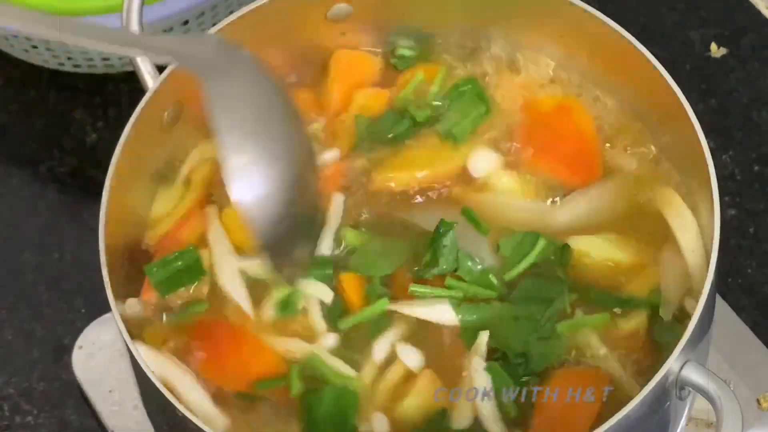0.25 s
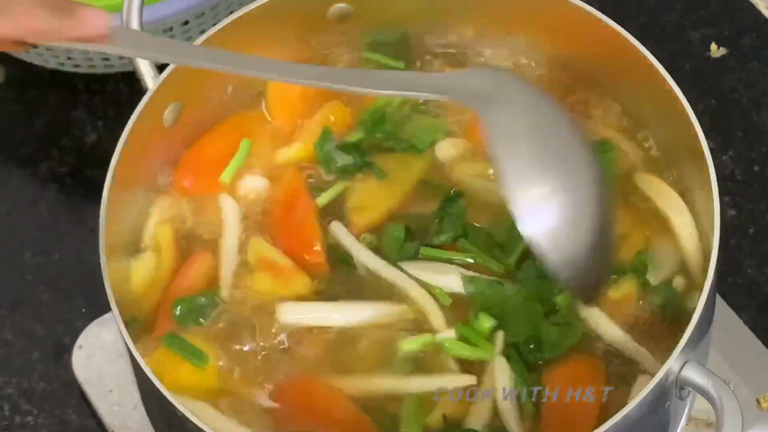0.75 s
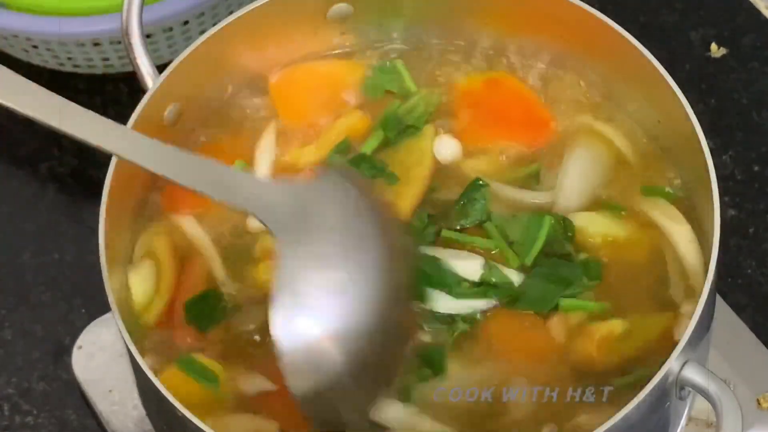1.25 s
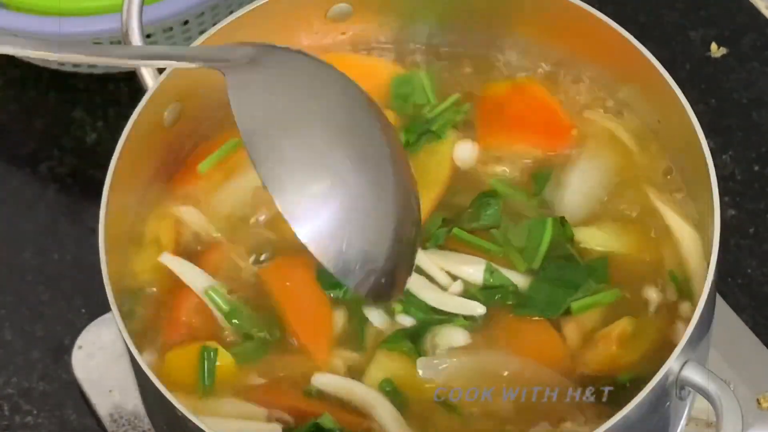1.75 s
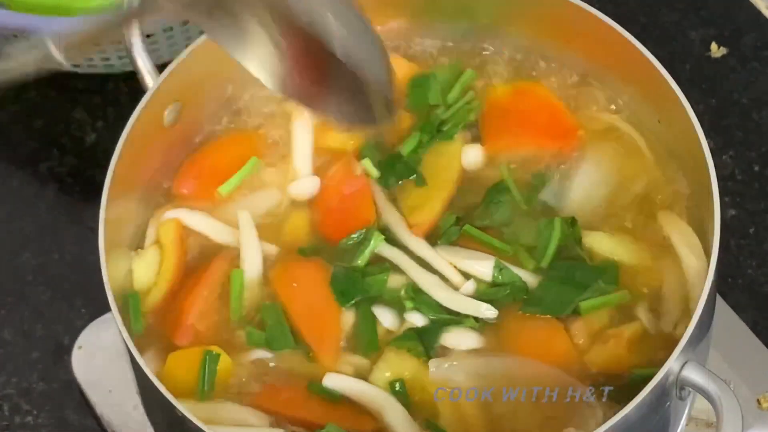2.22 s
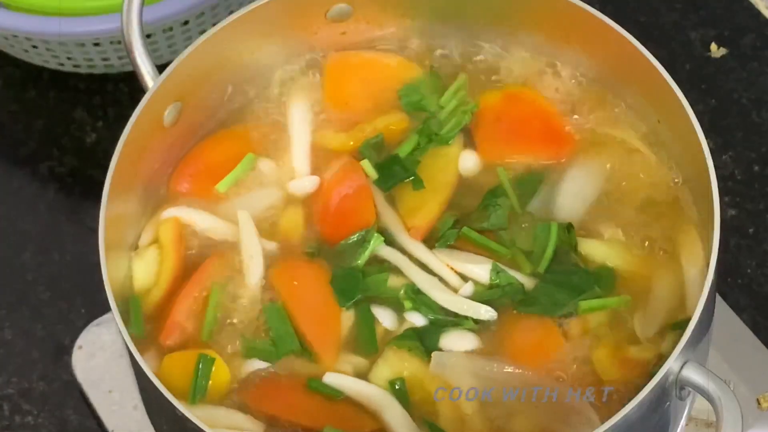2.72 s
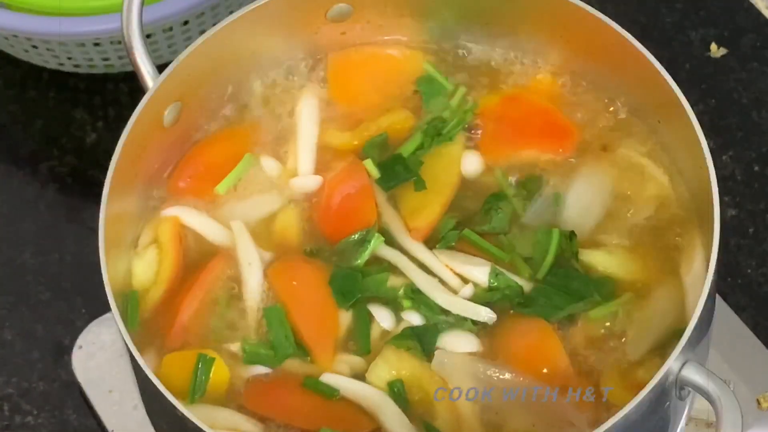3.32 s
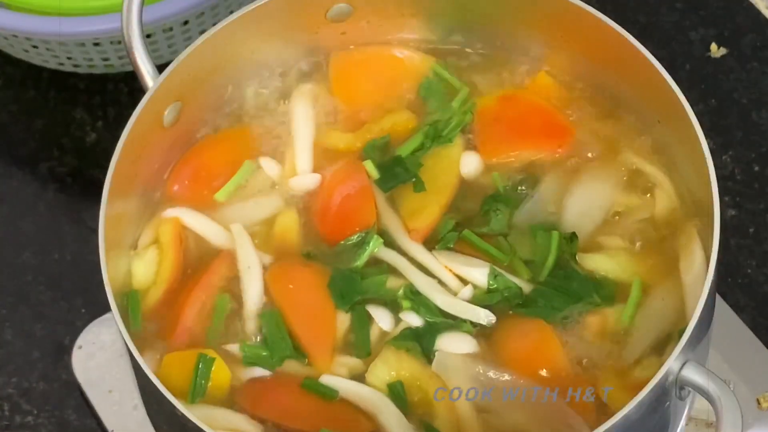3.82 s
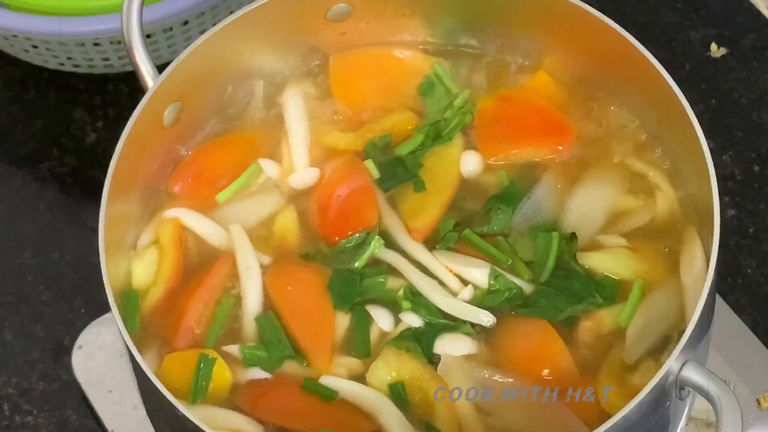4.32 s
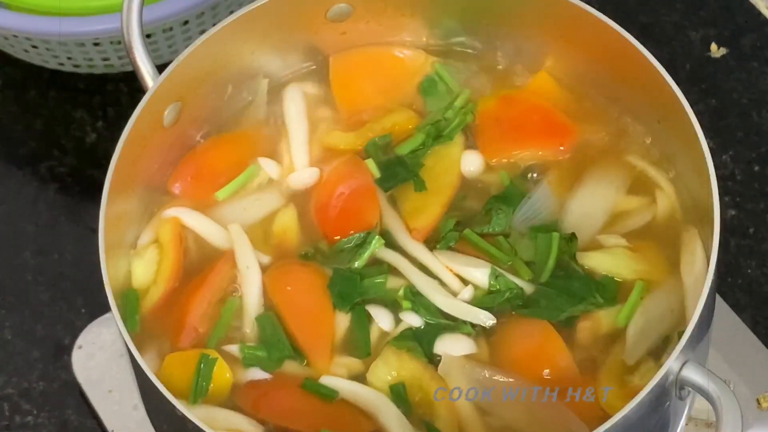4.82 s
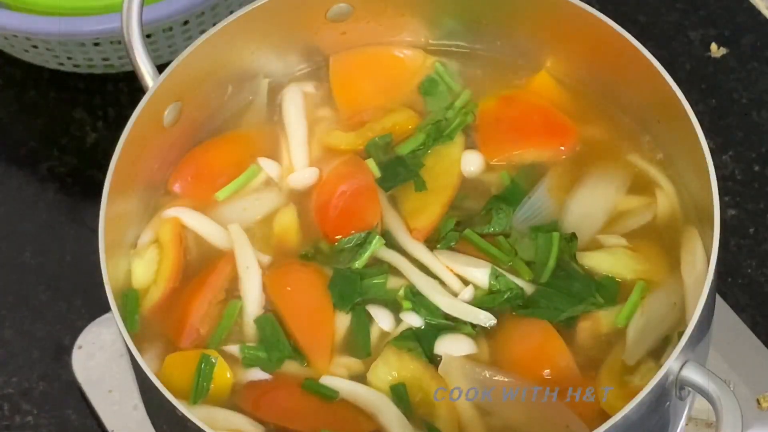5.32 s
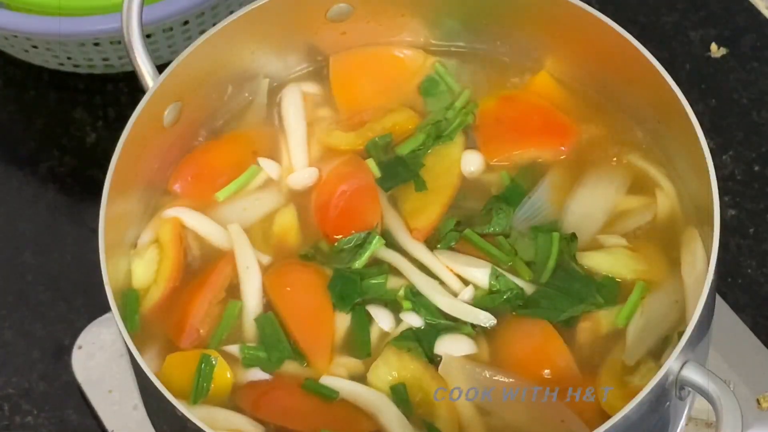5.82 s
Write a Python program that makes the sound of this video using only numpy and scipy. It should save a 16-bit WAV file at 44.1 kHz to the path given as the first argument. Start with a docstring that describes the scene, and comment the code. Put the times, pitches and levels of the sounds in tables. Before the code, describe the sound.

A pot of broth bubbles gently over a hissing, faintly whistling gas flame. Soft slosh and plops of stirring lead to one short bright ladle clink at about one second, then quiet drips. At three seconds the ladle clatters onto a hard surface. Three different metallic stove clicks follow, and the simmer calms to sparse crackle. Close stereo pickup, short lively kitchen reflections.

```python
"""Soup simmers over a gas jet's whistle and low rumble while a ladle stirs it, trapping air that plops.
The ladle clinks on the pot, drips, and is set down with a clatter: damped modes over clangs of noise.
As it lands the gas is turned down; then the knob ticks, the valve clunks and a sprung latch snaps.
Last, the pot cools and the fizz of the broth sinks; a small hard kitchen answers every knock."""
import sys
import numpy as np
from scipy import signal
from scipy.fft import rfft, irfft, next_fast_len
from scipy.io import wavfile

SR = 44100
rng = np.random.default_rng(int(sys.argv[2]) if len(sys.argv) > 2 else 0)


def unload_audio(sound):
    """Save the sound as a 16-bit wav file, at the path given as the first command line argument."""
    columns = np.transpose(np.atleast_2d(sound))
    # keep every value between -1 and 1, then stretch to whole-number steps
    steps = np.round(np.clip(columns, -1, 1) * 32767)
    wavfile.write(sys.argv[1], SR, steps.astype(np.int16))


N = 266960

# broth sliding round the ladle, and soft rubs: (time [s], length [s], level [dB], centre [Hz])
SWISHES = [(0.371, 0.18, -56, 1000), (1.424, 0.23, -57.5, 820), (2.822, 0.089, -51, 970),
           (2.95, 0.1, -50, 1480), (5.564, 0.13, -54.5, 696)]
TURN_DOWN_S, TURN_DOWN_TAKES_S = 3.13, 0.67  # gas turned down
DRIP_START_S = 1.939  # ladle lifted out


def amp(db):
    """Decibels to gain."""
    return 10 ** (np.asarray(db) / 20)


def unit(x):
    """x at rms 1."""
    return x / np.sqrt(np.mean(x ** 2) + 1e-20)


def along(points, hz):
    """(Hz, value) points read on a log frequency axis."""
    f, v = np.transpose(points)
    return np.interp(np.log(hz + 1), np.log(f + 1), v)


def filtered(x, response):
    """x times a response of frequency."""
    n = x.shape[-1]
    m = next_fast_len(n + SR // 4)
    spectrum = rfft(x, m) * response(np.fft.rfftfreq(m, 1 / SR))
    return irfft(spectrum, m)[..., :n]


def add(track, s, sound):
    """Mix a sound into the track from time s on."""
    i = max(round(s * SR), 0)
    track[..., i:i + sound.shape[-1]] += sound[..., :N - i]


def ramp(start_s, length_s):
    """0 before start_s, rising evenly to 1 over length_s."""
    return np.clip((np.arange(N) / SR - start_s) / length_s, 0, 1)


def pair(n, apart):
    """White noise at both microphones; apart is the share of power that they do not have in common."""
    apart = np.clip(apart, 0, 1)
    common = np.sqrt(1 - apart) * rng.standard_normal(n)
    return common + np.sqrt(apart) * rng.standard_normal((2, n))


def noise(spectrum, n, apart):
    """Stereo noise of rms 1 with the given spectrum."""
    return unit(filtered(pair(n, apart), lambda hz: amp(along(spectrum, hz))))


def kitchen(x, wet_db, apart=0.44, build_s=0.0016):
    """x plus the room's answer, which builds up quickly and dies at a speed set by frequency."""
    # reverberation: (frequency [Hz], t60 [s])
    decay = [(120, 1), (400, 0.5), (1000, 0.36), (2800, 0.58), (7000, 0.38), (14000, 0.24)]
    hz, t, z = signal.stft(pair(SR * 3 // 4, apart), SR, nperseg=256)
    fading = z * amp(-60 * t / along(decay, hz)[:, None])
    tail = signal.istft(fading, SR, nperseg=256)[1]
    tail = tail * (1 - np.exp(-np.arange(tail.shape[1]) / SR / build_s))
    tail = tail / np.linalg.norm(tail[0])
    echo = signal.fftconvolve(np.broadcast_to(x, (2, N)), tail, axes=1)[:, :N]
    return x + amp(wet_db) * echo


def bubble(hz, cycles, rise):
    """A pocket of air rings down 60 dB in about the given cycles, rising in pitch as it nears the surface."""
    t = np.arange(SR // 12) / SR
    age = t * hz / cycles
    pitch = hz * (1 + rise * (np.minimum(age, 1) - .15))
    phase = 2 * np.pi * np.cumsum(pitch) / SR
    return np.sin(phase) * np.exp(-np.log(1000) * age) * (1 - np.exp(-t / 0.00068))


def boiling(blips_db=-10, count=200):
    """A dull rush of boiling broth dotted with small bubbles."""
    # rush: (frequency [Hz], spectral level [dB])
    rush = [(150, -27), (300, -2.5), (800, -2.5), (1350, -3.5), (2000, -8), (3000, -13.5), (5000, -18.5),
            (9000, -49)]
    blips = np.zeros(N)
    for when, pitch, size in rng.random((count, 3)):
        blip = bubble(700 * 3 ** pitch, cycles=42, rise=0.77)
        add(blips, when * N / SR, amp(12 * size) * blip)
    return noise(rush, N, apart=0.34) + amp(blips_db) * unit(kitchen(blips, wet_db=1.5))


def simmer(ticks_per_s=90, cool_ticks_per_s=35, tick_db=-4, spread_db=5, ticks_cool_db=2):
    """Broth boils while tiny bursting bubbles fizz along the hot wall; both sink as the heat goes."""
    # fizz: (frequency [Hz], spectral level [dB])
    fizz = [(1500, -29), (3500, -15.5), (5000, 0), (7000, 1), (13000, 1), (14500, 1.5), (15500, -13),
            (16000, -24)]
    boil_db, boil_eases_db, boil_cools_db = -56, 2.5, 3  # start, loss on turning down, loss on cooling
    fizz_db, hiss_cools_db = -63.5, 12  # start, loss of hiss on cooling
    turned_down = ramp(TURN_DOWN_S, TURN_DOWN_TAKES_S)
    cooled = ramp(4.883, 0.59)  # start [s], length [s]
    rate = ticks_per_s * (1 - cooled) + cool_ticks_per_s * cooled
    bursts = (rng.random(N) < rate / SR) * amp(spread_db * rng.standard_normal(N).clip(-3, 2))
    ticks = unit(signal.lfilter([1], [1, -np.exp(-1 / (0.0014 * SR))], bursts))  # 1.4 ms decay
    # hiss loses more than the ticks, so single ticks stand out
    hiss = amp(-hiss_cools_db * cooled) * noise(fizz, N, apart=0.021)
    crackle = amp(tick_db - ticks_cool_db * cooled) * ticks * noise(fizz, N, apart=0.028)
    boil = amp(-boil_eases_db * turned_down - boil_cools_db * cooled) * boiling()
    return amp(boil_db) * boil + amp(fizz_db) * (hiss + crackle)


def background():
    """The thin whistle of the gas jet over the low rumble of room and flame; both follow the gas."""
    # jet resonances: (frequency [Hz], width [Hz], level [dB])
    jet = [(5730, 64, 0.5), (8100, 230, -6.5)]
    # room and flame: (frequency [Hz], spectral level [dB])
    low_spectrum = [(20, -26.5), (30, -11.5), (40, 0.5), (50, 3), (80, -6), (110, -2.5), (135, -10),
                    (165, -4.5), (210, -11.5), (350, -13), (900, -53.5)]
    jet_db, jet_closes_db = -70, 35  # start, loss on turning down
    rumble_db, rumble_eases_db = -53, 3
    turned_down = ramp(TURN_DOWN_S, TURN_DOWN_TAKES_S)

    def resonances(f):
        return sum(amp(db) / (1 + (2 * (f - hz) / width) ** 2) for hz, width, db in jet)

    whistle = unit(filtered(pair(N, .1), resonances))
    rumble = noise(low_spectrum, N, apart=0.24) * amp([[-1.2], [1.2]])
    whistle = amp(jet_db - jet_closes_db * turned_down) * whistle
    return whistle + amp(rumble_db - rumble_eases_db * turned_down) * rumble


def wash(hz, n):
    """The soft noise of moving liquid, centred on hz."""
    hump = [(hz / 8, -45), (hz / 3.1, -16), (hz, 0), (hz * 2.02, -20), (hz * 7, -55)]
    return noise(hump, n, apart=0.51)


def swirl_plops(count=3, over_swish_db=12, scatter_octaves=.25):
    """Each stroke of the ladle through the soup traps a few small pockets of air at random moments."""
    plops = []
    for s, length, db, hz in SWISHES:
        if s < DRIP_START_S:
            for when, pitch in rng.random((count, 2)):
                plop_hz = hz * 2 ** (scatter_octaves * (2 * pitch - 1))
                plops.append((s + length * when, db + over_swish_db, plop_hz))
    return plops


def drips(count=3, every_s=.0595, first_db=-43, loss_db=2.5, hz=1320):
    """Drops fall from the lifted ladle at an even pace, each a little quieter."""
    return [(DRIP_START_S + k * every_s, first_db - k * loss_db, hz) for k in range(count)]


def stirring(plop_db=2, splash_db=-7):
    """The ladle traps air, which plops with a small splash; sliding broth swells and fades."""
    # air pockets closing in the broth: (time [s], level before plop_db [dB], nominal pitch [Hz])
    pockets = [(.084, -39.5, 1880), (.387, -32, 1200), (.478, -39, 1060), (.555, -41, 1166),
               (.9898, -23, 1070), (1.45, -39.5, 1640), (1.491, -40, 950), (1.59, -35.5, 882),
               (3.574, -44, 1340)]
    track, t = np.zeros((2, N)), np.arange(SR // 12) / SR
    for s, db, hz in list(pockets) + drips() + swirl_plops():
        splash = wash(hz, len(t)) * np.exp(-t / 0.0045)
        plop = bubble(hz, cycles=19.5, rise=0.34) + amp(splash_db) * splash
        add(track, s, amp(db + plop_db) * plop)
    for s, length, db, hz in SWISHES:
        n = int(length * SR)
        swell = np.sqrt(np.hanning(n).clip(0))
        add(track, s, amp(db) * swell * wash(hz, n))
    return kitchen(track, wet_db=-8.5)


def struck(hits, modes, body, ring_db, body_db, body_t60, crack_db,
           crack_t60=0.0056, rattle_hz=38, attack_s=0.0009, size=128):
    """Each contact gives a crack, a short dense clang and ringing modes; harder contacts are brighter."""
    track, t = np.zeros((2, N)), np.arange(SR // 2) / SR
    hz, db, t60 = np.transpose(modes)[:, :, None]

    def fade(life):
        return np.exp(-np.log(1000) * t / life) * (1 - np.exp(-t / attack_s))

    ringing = amp(db + ring_db) / np.linalg.norm(amp(db)) * fade(t60)
    clanging = amp(body_db) * fade(body_t60) + amp(crack_db) * fade(crack_t60)
    clanging = clanging[:SR // 8]
    wander_hz = rattle_hz * (hz / 2000) ** 0.2
    for s, level_db, hardness in hits:
        def tilt(f):
            return amp(hardness * np.log2(np.maximum(f, 400) / 2000))

        # loose metal on metal jostles each mode's pitch every size samples
        steps = rng.standard_normal((len(hz), len(t) // size + 1))
        jostle = np.repeat(steps, size, axis=1)[:, :len(t)]
        turns = np.cumsum(hz + wander_hz * jostle, axis=1) / SR + rng.random(hz.shape)
        waves = np.sin((2 * np.pi * turns).astype("float32"))
        ring = np.sum(tilt(hz) * ringing * waves, axis=0)
        clang = clanging * filtered(noise(body, len(clanging), apart=0.15), tilt)
        add(track, s, amp(level_db) * ring)
        add(track, s, amp(level_db) * clang)
    return track


def rebounding(hits, loss_db, flight_s=.0048, softer_db_per_octave=2.67):
    """The loose ladle meets the surface again after each blow, weaker and duller."""
    again = [(s + flight_s, db - loss_db, hardness - softer_db_per_octave) for s, db, hardness in hits]
    return list(hits) + again


def skid(hit, count=3, lead_s=.0115, first_db=-13, grows_db=3.5):
    """Evenly spaced grazes that grow towards a blow; first_db is relative to the blow."""
    s, db, hardness = hit
    return [(s - lead_s * (1 - k / count), db + first_db + k * grows_db, hardness) for k in range(count)]


def ladle_clinks():
    """The bowl of the ladle hits the pot, whose ring the soup damps."""
    # contacts: (time [s], relative level [dB], hardness [dB/octave])
    hits = [(.9362, -8, 1), (.9895, -29, -5), (1.491, -40, -3), (2.452, -42.5, -3.5)]
    # clear modes: (mean frequency [Hz], relative level [dB], t60 [s])
    modes = [(1068, -3, 0.046), (1246, -1, 0.039), (1556, -4.5, 0.068), (1693, -2.5, 0.037),
             (2523, -5, 0.029), (2886, -6, 0.055), (4280, -11, 0.05), (4240, -7.5, 0.073),
             (5560, -11.5, 0.034), (6160, -7, 0.048), (6310, 1.5, 0.036), (7380, -7, .04),
             (7480, -1.5, 0.034), (12000, -8.5, 0.045), (13000, -14.5, 0.04)]
    # crowd of short-lived modes: (frequency [Hz], spectral level [dB])
    body = [(60, -13.5), (130, 2), (330, -20.5), (600, -5.5), (1050, -0.5), (1900, -7.5), (3000, -11.5),
            (4200, -4), (5300, -7.5), (6600, -4), (7700, -5.5), (10000, -24), (13000, -14.5), (16000, -32)]
    clink = struck(rebounding(hits, loss_db=12), modes, body, ring_db=-6.5, body_db=-13.5,
                   body_t60=0.046, crack_db=-2.5, crack_t60=0.012, rattle_hz=65)
    return kitchen(clink, wet_db=-4.0) * amp([[.5], [-.5]])


def ladle_laid_aside():
    """The ladle skids into its first blow and clatters to rest."""
    # contacts: (time [s], relative level [dB], hardness [dB/octave])
    hits = [(3.0622, -16, 0.5), (3.0797, -14.5, 0), (3.1455, -27, 3), (3.206, -30.5, 0)]
    # clear modes: (mean frequency [Hz], relative level [dB], t60 [s])
    modes = [(517, -5.5, 0.079), (710, -6, 0.088), (823, -3, 0.082), (952, -4.5, 0.11), (1273, -9, 0.055),
             (1655, -7, 0.11), (2170, -8.5, 0.047), (3440, -11.5, 0.051), (4710, -9, 0.13),
             (6600, -11.5, 0.047)]
    # crowd of short-lived modes: (frequency [Hz], spectral level [dB])
    body = [(35, -40), (130, -9.5), (330, -12.5), (600, -3.5), (1050, -1), (1900, -6.5), (2800, -10.5),
            (3700, -9.5), (5300, -11), (6600, -16.5), (7700, -15.5), (10000, -25), (13000, -17.5),
            (16000, -33.5)]
    landing = rebounding(hits, loss_db=3.5) + skid(hits[0])
    clatter = struck(landing, modes, body, ring_db=-3, body_db=-4, body_t60=0.08,
                     crack_db=-5, rattle_hz=34.3, attack_s=0.0005)
    return kitchen(clatter, wet_db=-4.5) * amp([[.1], [-.1]])


def knob():
    """The ticking knob rings its own part of the sheet-metal case."""
    # contacts: (time [s], relative level [dB], hardness [dB/octave])
    hits = [(3.9704, -17.5, 0), (3.994, -37, 2), (4.113, -41.5, 2.6)]
    # clear modes: (mean frequency [Hz], relative level [dB], t60 [s])
    modes = [(1095, -3, 0.083), (1150, -3, 0.033), (2190, -9.5, 0.27), (2243, -4, 0.043), (2303, -14, 0.23),
             (2960, -30, 0.092), (3830, -7, 0.027), (3904, -11.5, 0.14), (4180, -13, 0.1),
             (5938, -18, 0.11), (7400, -12, 0.068), (12080, -15, 0.045)]
    # crowd of short-lived modes: (frequency [Hz], spectral level [dB])
    body = [(60, 3.5), (130, -2.5), (330, -4.5), (600, 1), (1050, -0.5), (1900, 5), (3700, -2),
            (5300, -2.5), (6600, -8), (7700, -8), (10000, -26), (13000, -24), (16000, -32)]
    tick = struck(hits, modes, body, ring_db=-1.0, body_db=-10.0, body_t60=0.075,
                  crack_db=-3.0, rattle_hz=57.3)
    return kitchen(tick, wet_db=-5.5)


def valve():
    """The clunking valve rings its own part of the case, with a strong crack."""
    # contacts: (time [s], relative level [dB], hardness [dB/octave])
    hits = [(4.3463, -34, 4.5), (4.353, -28.5, -2), (4.3595, -25, -2)]
    # clear modes: (mean frequency [Hz], relative level [dB], t60 [s])
    modes = [(721, -2, .11), (1031, -2, .1), (1125, 1, .1), (1938, -8, .2), (2207, -13, .11),
             (3117, -10, .13), (3295, -10, .13), (3825, -10, .22), (7442, -13, .13), (9456, -19, .12),
             (11418, -17, .1), (4480, -10.5, .18), (4570, -14, .25)]
    # crowd of short-lived modes: (frequency [Hz], spectral level [dB])
    body = [(60, -12), (130, -19), (330, -11.5), (600, -7.5), (1050, -2.5), (1900, -8), (3700, -13),
            (5300, -14), (6600, -14.5), (7700, -16), (10000, -33), (13000, -22), (16000, -47.5)]
    clunk = struck(hits, modes, body, ring_db=3, body_db=-5.5, body_t60=0.076,
                   crack_db=11.5, rattle_hz=33.3)
    return kitchen(clunk, wet_db=-6.5)


def latch():
    """The sprung latch snaps and rings its own part of the case."""
    # contacts: (time [s], relative level [dB], hardness [dB/octave])
    hits = [(4.606, -14.5, .5), (4.618, -20.5, -2.5), (4.638, -20.5, -3.5), (4.687, -26, -5)]
    # clear modes: (mean frequency [Hz], relative level [dB], t60 [s])
    modes = [(1015, -3.5, .11), (1117, -6, .11), (1550, -10, .13), (2030, -2.5, .13), (2234, -10, .14),
             (2450, -15, .12), (2756, -12, .14), (3163, -8, .15), (3564, -8, .15), (3873, -3, .15),
             (6409, -8, .25), (7660, -8, .08), (7900, -10, .07), (9434, -9, .1), (11400, -20, .1),
             (4520, 2, .2), (4560, -18, .75), (5981, 2, .16)]
    # crowd of short-lived modes: (frequency [Hz], spectral level [dB])
    body = [(60, -15), (130, -17.5), (330, -13.5), (600, -4), (1050, 1.5), (1900, -1), (3700, 0), (4600, 2),
            (5300, -11), (6600, -16), (7900, -10), (10300, -36.5), (13000, -15.5), (16000, -37)]
    snap = struck(hits, modes, body, ring_db=-1, body_db=-5.0, body_t60=0.14,
                  crack_db=-2.0, rattle_hz=34.5)
    return kitchen(snap, wet_db=-6)


def stove():
    """Knob, valve and latch, all slightly left."""
    return (knob() + valve() + latch()) * amp([[.6], [-.6]])


def scene():
    """Everything that sounds around the pot."""
    return simmer() + background() + stirring() + ladle_clinks() + ladle_laid_aside() + stove()


def record(dry, low_cut_hz=36, top_hz=15800):
    """Two microphones differ in phase, weaken the deepest bass and pass nothing from top_hz up."""
    # phase between microphones: (frequency [Hz], lead of the left [rad])
    ports = [(0, -1), (70, -0.7), (130, -1.32), (300, -3), (1000, -4.5), (1200, -6.5), (2700, -4.5),
             (3800, -5.5), (4900, -2.5), (6400, -1), (7500, 0.5), (9500, 2.5), (10300, 3.5), (11900, 7.5),
             (12900, 5.5), (14500, -3)]

    def response(hz):
        lead = np.interp(hz, *np.transpose(ports))
        band = (hz < top_hz) / np.sqrt(1 + (low_cut_hz / (hz + 1)) ** 8)
        return np.exp(.5j * np.array([lead, -lead])) * band

    return filtered(dry, response)


dry = scene()
out = record(dry)
unload_audio(out)
```